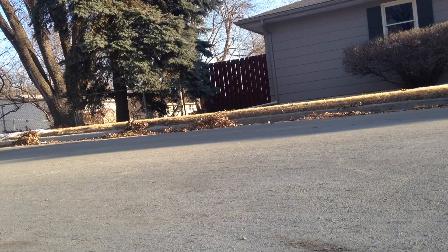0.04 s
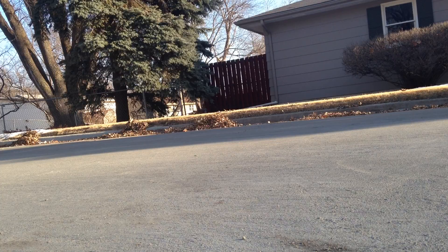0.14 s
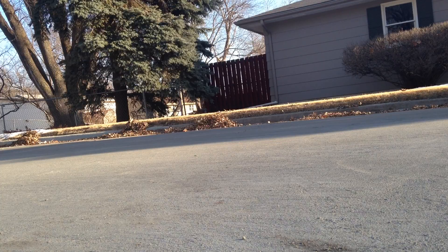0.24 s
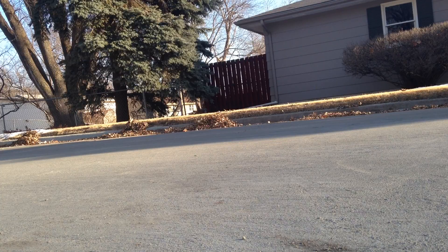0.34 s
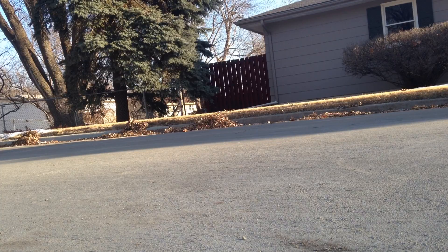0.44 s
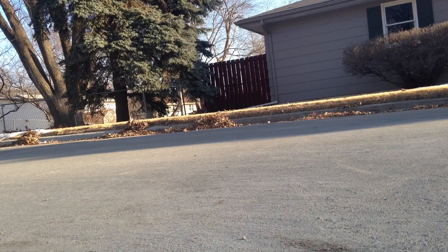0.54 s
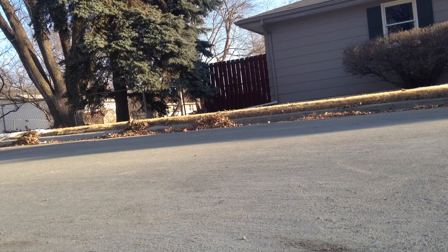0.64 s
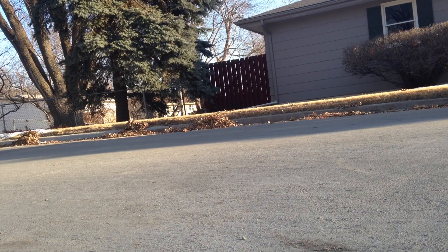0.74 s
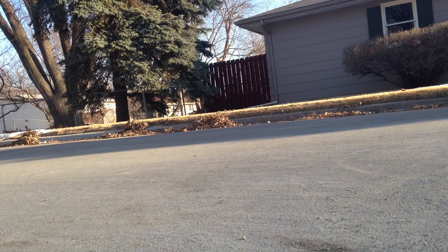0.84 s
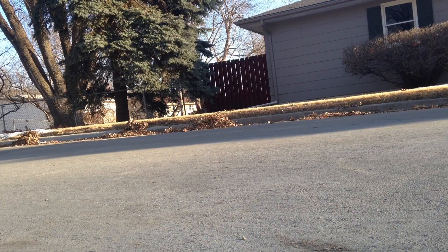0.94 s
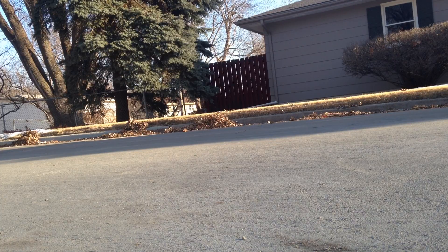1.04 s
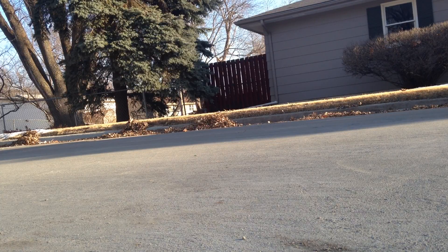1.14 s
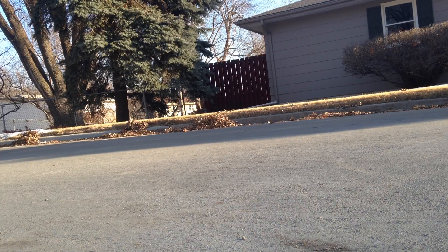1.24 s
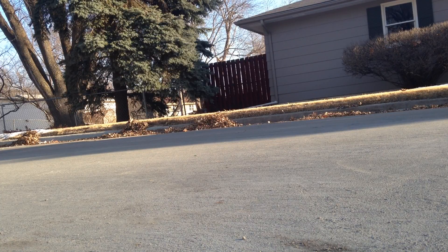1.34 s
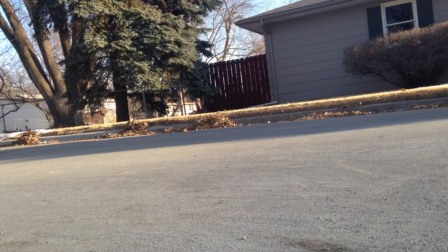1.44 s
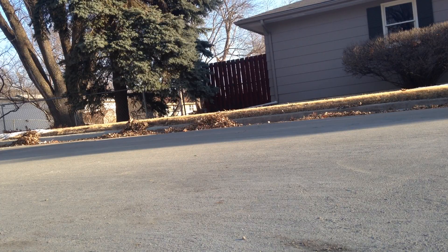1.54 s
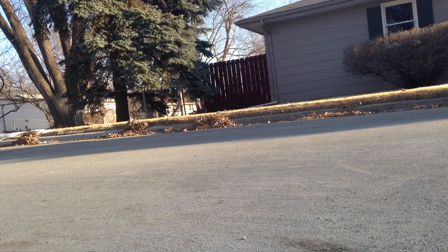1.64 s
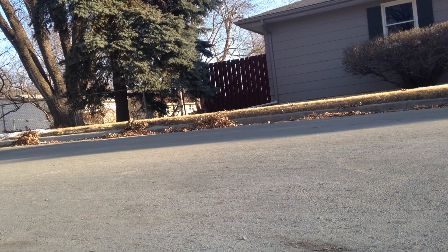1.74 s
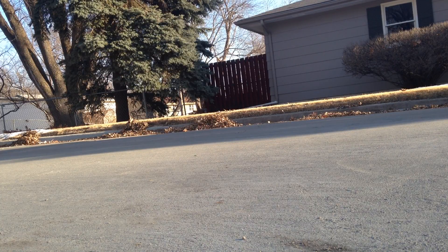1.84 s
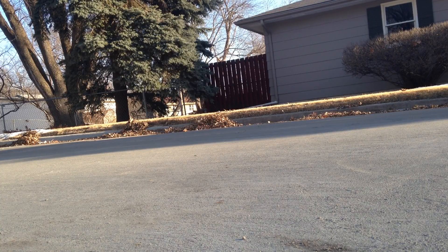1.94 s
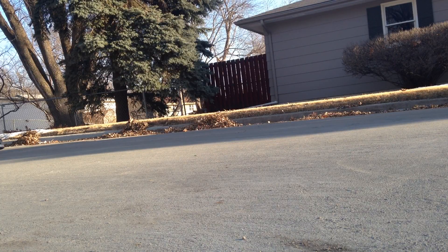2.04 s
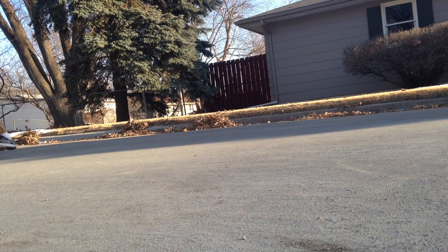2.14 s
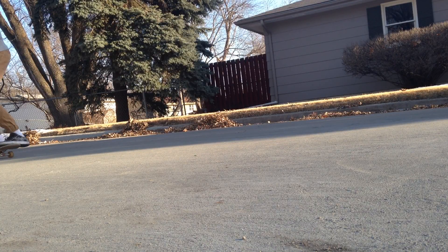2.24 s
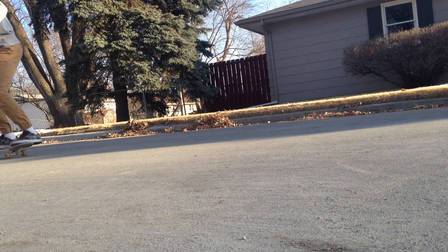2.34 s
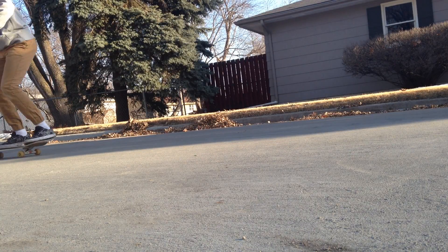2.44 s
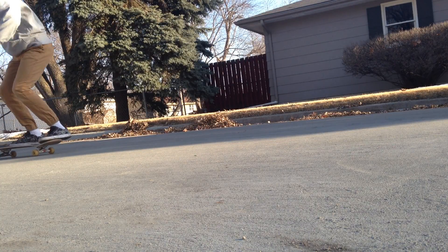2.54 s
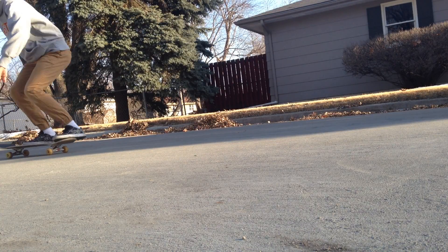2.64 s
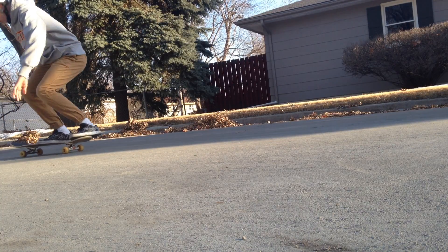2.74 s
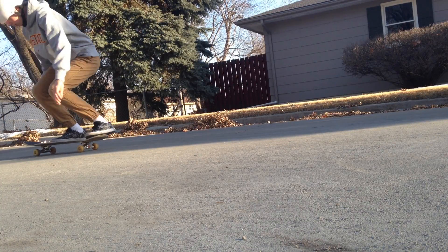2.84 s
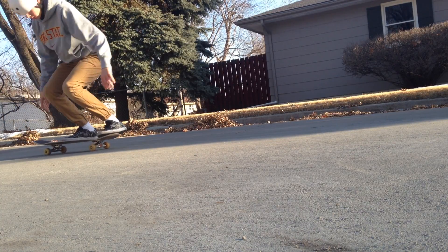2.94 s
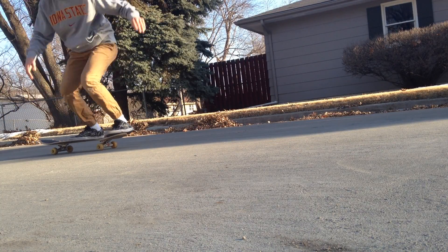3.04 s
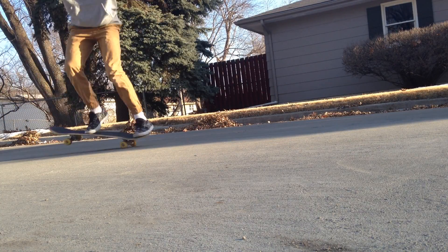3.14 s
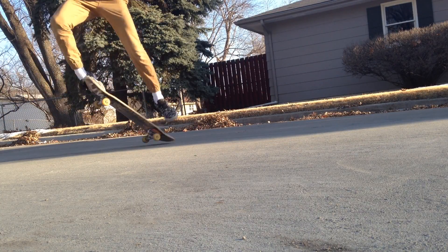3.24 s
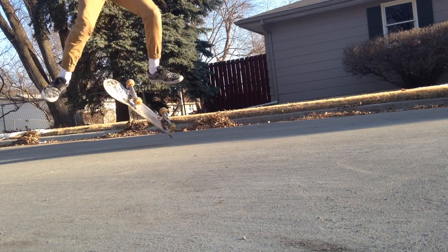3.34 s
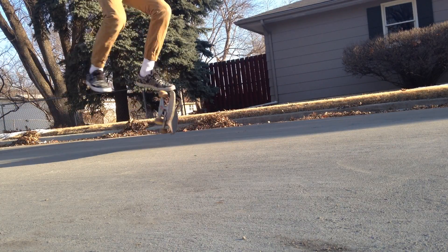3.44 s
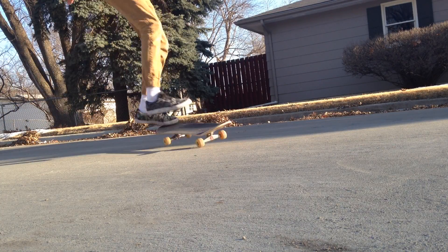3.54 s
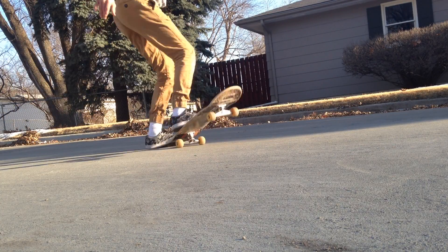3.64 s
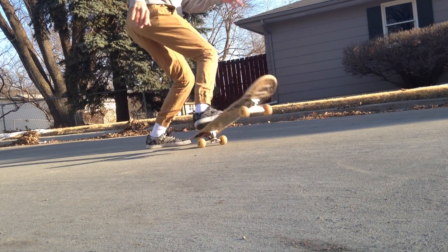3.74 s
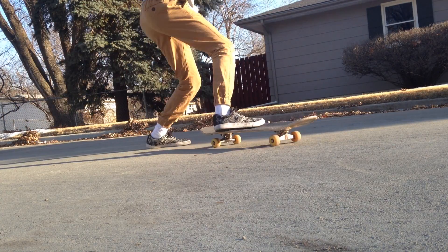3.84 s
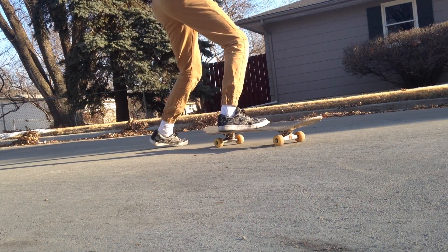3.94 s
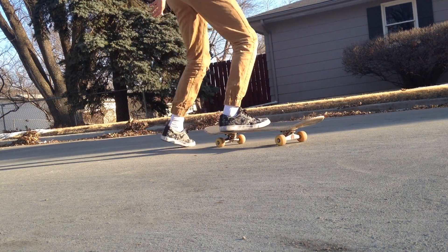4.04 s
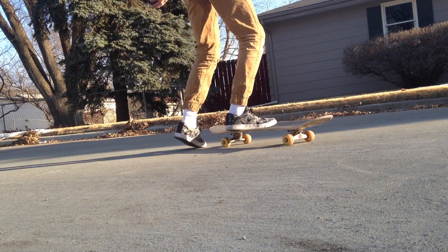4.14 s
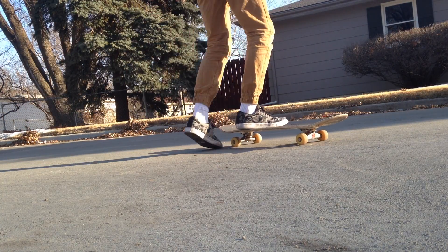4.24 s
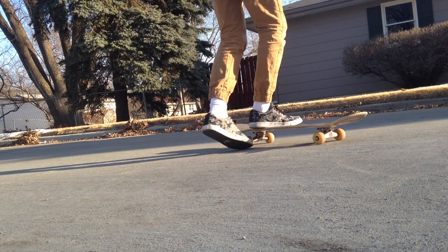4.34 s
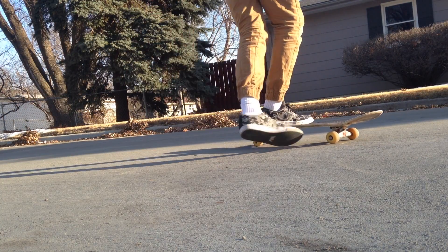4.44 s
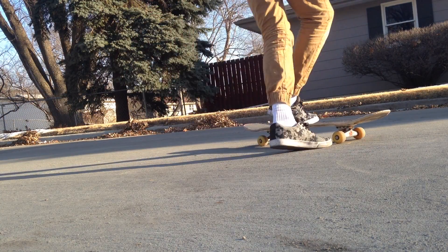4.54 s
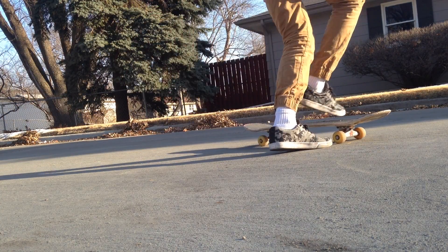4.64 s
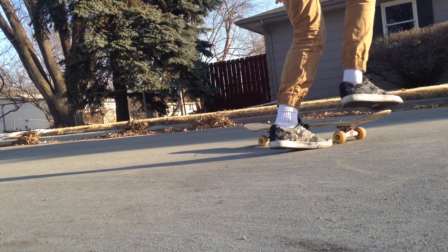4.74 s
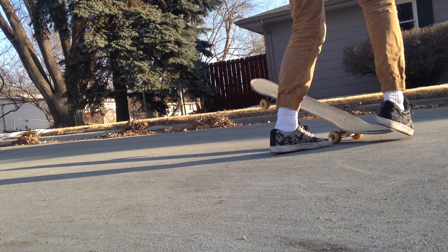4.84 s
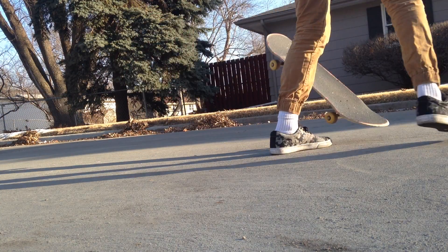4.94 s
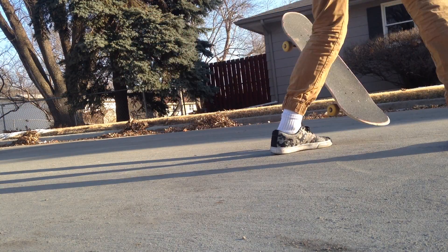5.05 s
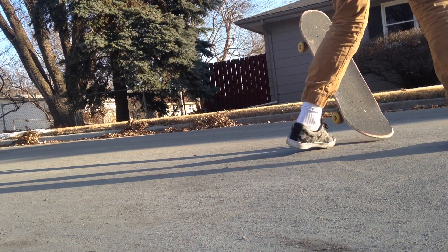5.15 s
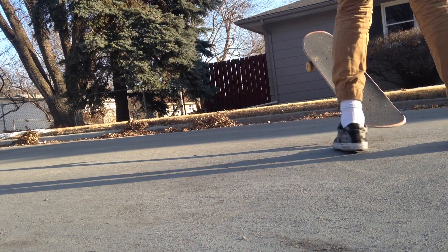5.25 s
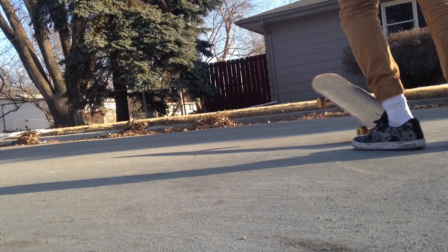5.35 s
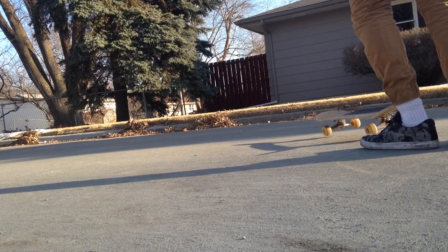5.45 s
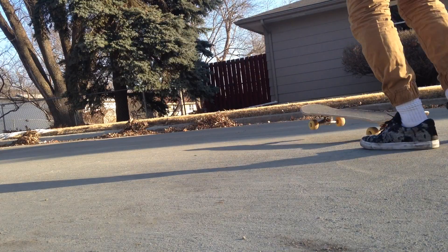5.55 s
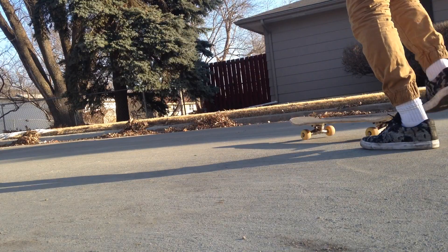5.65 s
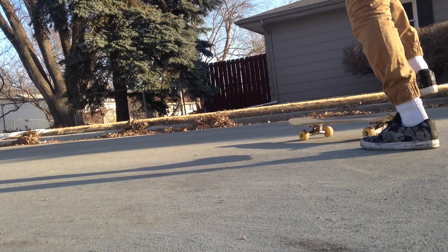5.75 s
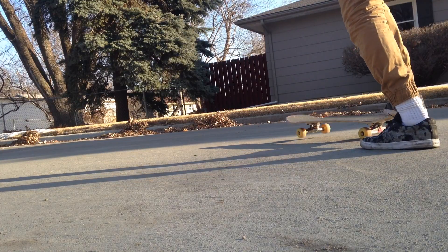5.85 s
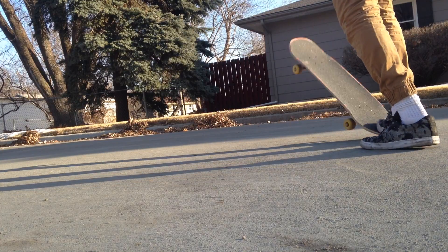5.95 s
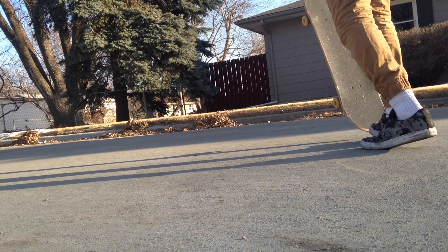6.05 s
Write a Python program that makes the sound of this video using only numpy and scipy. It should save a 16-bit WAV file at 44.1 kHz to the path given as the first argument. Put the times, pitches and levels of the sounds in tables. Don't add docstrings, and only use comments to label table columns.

```python
import sys
import numpy as np
from scipy import signal
from scipy.fft import rfft, irfft, next_fast_len
from scipy.io import wavfile
from scipy.ndimage import uniform_filter1d, map_coordinates

SR = 44100
rng = np.random.default_rng(int(sys.argv[2]) if len(sys.argv) > 2 else 0)


def store_pcm(level_fs):
    pcm = np.round(np.clip(level_fs, -1, 1) * 32767).astype(np.int16)
    wavfile.write(sys.argv[1], SR, np.atleast_2d(pcm).T)


def makeup_ratio(level_db):
    decades = np.asarray(level_db, float) / 20
    return 10 ** decades


N = 268128


def unit(x):
    return x / np.sqrt(np.mean(x ** 2) + 1e-20)


def along(points, hz):
    f, v = np.transpose(points)
    return np.interp(np.log(hz + 1), np.log(f + 1), v)


def curves(rows):
    s, *cols = np.transpose(rows)
    return [np.interp(np.arange(N) / SR, s, c) for c in cols]


def wobble(rate):
    knots = rng.standard_normal(int(N * 200 / SR) + 4)
    return map_coordinates(knots, [np.arange(N) * rate / SR])


def filtered(x, response):
    m = next_fast_len(N + SR // 2)
    return irfft(rfft(x, m) * response(np.fft.rfftfreq(m, 1 / SR)), m)[:N]


def coloured(x, spectrum):
    return unit(filtered(x, lambda hz: makeup_ratio(along(spectrum, hz))))


def resonance(centre_hz, width_hz):
    def response(f):
        swing = 1j * f * width_hz
        return swing / (centre_hz ** 2 - f * f + swing) / np.sqrt(width_hz / SR)
    return response


def bumps(rate, spread_db, smooth):
    hit = rng.random(N) < rate / SR
    size = makeup_ratio(spread_db * np.minimum(rng.exponential(size=N), 4)) * rng.standard_normal(N)
    return unit(hit * size) + smooth * rng.standard_normal(N)


def patchy(x, depth_db):
    z = signal.stft(x, nperseg=512)[2]
    field = uniform_filter1d(rng.standard_normal(z.shape), size=9, axis=0)
    field = uniform_filter1d(field, size=10, axis=1)
    return signal.istft(z * makeup_ratio(depth_db * unit(field)), nperseg=512)[1][:N]


def added(*levels_db):
    return 10 * np.log10(sum(makeup_ratio(2 * db) for db in levels_db))


STROKE_DB = 20


def strokes(rows, base_db, base_value):
    t = np.arange(0, N, 32) / SR
    power = makeup_ratio(2 * base_db[::32])
    value = power * base_value
    for s, rise, fall, db, v in rows:
        away = np.where(t < s, (s - t) / rise, (t - s) / fall).clip(0, 6)
        one = makeup_ratio(2 * (db - STROKE_DB * away))
        power = power + one
        value = value + one * v
    return curves(np.transpose([t, 10 * np.log10(power), value / power]))


def snaps(rows, t60, rise_s, q):
    out, t = np.zeros(N + SR), np.arange(SR // 25) / SR
    for s, db, hz in rows:
        burst = makeup_ratio(-60 * t / t60) * (1 - np.exp(-t / rise_s)) * rng.standard_normal(len(t))
        band = signal.lfilter(*signal.iirpeak(hz, q, SR), burst)
        out[round(s * SR):][:len(t)] += makeup_ratio(db + 8.0) * band / abs(band).max()
    return filtered(out[:N], lambda f: (1j * f / 1200) ** 2 / (1 + 1.4j * f / 1200 - (f / 1200) ** 2))


def plucks(rows):
    out, t = np.zeros(N + SR), np.arange(SR // 16) / SR
    fade = makeup_ratio(-60 * t / 0.026)
    shape = fade * (1 - np.exp(-t / 0.00073)) ** 2
    for (s, db, hz), (a, b, c) in zip(rows, rng.random((len(rows), 3))):
        tone = np.sin(2 * np.pi * (hz * t + a))
        tone += .3 * np.sin(2 * np.pi * (hz * (0.718 + 0.2 * b) * t + c))
        tone += .8 * fade * np.sin(2 * np.pi * (hz * (1.3 + .3 * c) * t + b))
        out[round((s - .001) * SR):][:len(t)] += makeup_ratio(db - 5.0) * tone * shape / shape.max()
    return out[:N]


# (frequency [Hz], level [dB per Hz])
AIR_COLOUR = [(410, -13), (700, -1), (1630, -18), (2880, -24.5), (3780, -23), (15600, -29)]


def air():
    return makeup_ratio(-53.5) * coloured(rng.standard_normal(N), AIR_COLOUR)


# (time [s], level [dB])
ROLLING = [(0, -42.5), (.9, -43), (1.05, -46), (1.12, -44), (1.8, -44.5), (1.97, -37), (2.36, -41.5),
           (2.73, -35.5), (3.08, -47), (3.2, -32.5), (3.66, -46), (3.765, -22.5), (3.86, -45), (4.0, -53.5),
           (4.8, -52), (5.2, -47), (5.57, -47), (6.08, -43.5)]


def rolling_level():
    return curves(ROLLING)[0]


# (time [s], level [dB])
GROUND_RUMBLE = [
    (0, -47),
    (.86, -41),
    (1.3, -45.5),
    (1.9, -44.5),
    (3.4, -45.5),
    (3.75, -57.5),
    (4.6, -52.5),
    (5.0, -50.5),
    (6.08, -47.5),
]
# (frequency [Hz], level [dB per Hz])
RUMBLE_COLOUR = [(13, -57), (22, -25), (50, -10), (97, -0.5), (194, -2.5), (312, -12), (330, -43.5),
                 (430, -31), (730, -120)]
# (frequency [Hz], level [dB per Hz])
TREAD_COLOUR = [(120, -41), (200, -22), (242, 0), (319, -53.5), (410, -5.5), (544, -4.5), (900, -17),
                (1170, -40), (1980, -120)]


def wheels(tread_db):
    rumble = coloured(makeup_ratio(1.2 * wobble(14)) * rng.standard_normal(N), RUMBLE_COLOUR)
    stones = makeup_ratio(2.2 * wobble(22)) * bumps(700, 2.5, smooth=.8)
    bend = unit(filtered(stones, lambda f: resonance(331, 120)(f) ** 2))
    tread = coloured(stones, TREAD_COLOUR) + 0.62 * bend
    rumble_db = curves(GROUND_RUMBLE)[0]
    return makeup_ratio(rumble_db + 4.5) * rumble + makeup_ratio(tread_db - 2.0) * tread


# (time [s], peak level [dB], centre [Hz])
SAND_GRAINS = [(.041, -48, 4500), (.081, -44, 7000), (.1, -46, 7000), (.12, -50, 7500), (.2254, -40, 8150),
               (.2947, -44, 7000), (.3117, -41, 8440), (.392, -52, 7500), (.4643, -54, 4500),
               (.5297, -47, 5000), (.5891, -35, 7500), (.6135, -38, 6800), (.68, -29.5, 6000),
               (.6988, -36, 8500), (.7307, -35, 7500), (.7951, -29, 6000), (.802, -32.5, 7500),
               (.896, -34, 7500), (.904, -32, 8000), (.931, -34, 8000), (.9797, -39, 5000),
               (1.004, -26, 7650), (1.034, -25, 8000), (4.383, -44, 7000), (4.48, -47, 4000),
               (4.512, -39, 4500), (4.543, -41, 5000), (4.556, -44, 6000), (5.393, -18, 4000),
               (5.438, -21.5, 6500), (5.646, -33, 3000), (5.827, -34, 4500), (5.855, -40, 3500),
               (5.918, -31, 5000), (5.972, -36, 3100), (3.348, -24, 3000), (3.392, -28, 2800),
               (3.253, -35, 5000), (3.263, -36, 3500)]


def grains():
    return makeup_ratio(-8.0) * snaps(SAND_GRAINS, t60=0.011, rise_s=.0004, q=2.1)


# (peak time [s], rise [s], fall [s], level [dB], fine over coarse [dB])
GRINDS = [(.045, 0.04, 0.21, -46.5, -12), (.79, 0.22, 0.38, -57, 8), (1.04, 0.71, 0.059, -40, -3),
          (1.42, 9.7, 0.25, -49.5, -4), (1.732, 0.31, 0.14, -45.5, -3.5), (1.92, 0.048, 0.17, -34, -2),
          (2.12, 0.34, 0.95, -44.5, -3.5), (2.711, 0.089, 0.35, -45, -2.5), (2.903, .012, 0.037, -48, -15),
          (3.215, 0.13, 0.039, -31.5, -5.5), (3.315, 0.037, 0.086, -22, -5.5),
          (3.64, 0.094, 0.42, -39.5, -8), (3.72, 0.096, 0.018, -39, 5.5), (3.87, .02, 0.027, -55, -6),
          (3.94, 0.029, 0.016, -33, -3), (4.05, 0.16, 0.025, -42, -0.5), (4.19, 0.05, 0.36, -43.5, 1.5),
          (4.41, 0.72, 0.019, -54, 10.5), (4.56, 0.1, 0.017, -44.5, -14), (4.955, 0.039, 0.077, -29.5, -11),
          (5.37, 0.031, 0.45, -31.5, -10.5), (5.564, 0.051, 0.025, -29, -3.5),
          (5.64, 0.035, 0.074, -30, -8), (5.715, 0.035, 0.045, -26.5, -3)]
# (peak time [s], rise [s], fall [s], level [dB], fine over coarse [dB])
KICKED_SAND = [(.803, 0.015, 0.038, -30.5, -5), (0.944, 0.018, 0.02, -26, -8), (1.006, .006, .012, -41, -2),
               (1.034, 0.01, 0.011, -24.5, -12), (3.727, 0.018, 0.017, -25.5, -4),
               (3.65, 0.018, 0.033, -27, -3.5), (2.487, .008, 0.061, -39.5, -6),
               (2.667, .005, .015, -46, -4), (1.755, 0.022, 0.0091, -36, -6), (4.5, 0.037, 0.097, -49, -18),
               (5.045, 0.0088, 0.062, -33, -9), (5.21, 0.0091, 0.067, -33, -23),
               (5.785, .01, 0.038, -34.5, 1), (5.826, 0.066, 0.013, -36.5, -4),
               (5.9, 0.0075, 0.11, -36.5, -7.5), (6.0, 0.0093, 0.12, -32, -9),
               (6.05, 0.018, 0.14, -36, -15)]
# (frequency [Hz], level [dB per Hz])
COARSE_SAND = [(1290, -13), (2200, 2), (2790, 4), (3540, 9.5), (4310, 3.5), (4660, 6.5), (7000, 0),
               (9100, -21.5), (15400, -120)]
# (frequency [Hz], level [dB per Hz])
FINE_SAND = [(3240, -77), (5500, -21.5), (6460, 3.5), (7360, 6), (8320, 8), (14700, -2), (15600, -21.5)]


def grit(scrape_db):
    coarse_db, fine_over_db = strokes(GRINDS + KICKED_SAND, scrape_db - 25.5, 9)
    sand = patchy(makeup_ratio(2.2 * wobble(70)) * bumps(2500, 2.5, smooth=1.0), depth_db=1.5)
    coarse = makeup_ratio(coarse_db - 6.0) * coloured(sand, COARSE_SAND)
    return coarse + makeup_ratio(coarse_db + fine_over_db - 6.0) * coloured(sand, FINE_SAND)


# (peak time [s], rise [s], fall [s], level [dB], loudest deck resonance [Hz])
TAIL_DRAGS = [(.224, 0.077, 0.26, -39, 1270), (.532, 0.006, 0.65, -32, 1630), (.74, 0.14, 0.3, -27, 1670),
              (.805, 0.37, 0.088, -29, 920), (1.04, 0.52, 0.04, -23, 1180), (1.31, 0.026, 0.18, -34, 1480),
              (1.93, 0.082, 0.089, -30, 1410), (2.15, 0.26, 0.33, -41, 1350),
              (3.315, 0.0072, 0.13, -20, 1090), (3.395, 0.125, 0.031, -20, 1000),
              (3.46, 0.039, 0.078, -28.5, 1300), (3.675, 0.078, 0.18, -27.5, 1290),
              (3.87, 0.035, 0.0062, -22, 1080), (3.94, 0.035, 0.06, -30.5, 1020),
              (4.25, 0.4, 0.14, -41.5, 1110), (4.84, 0.025, 0.011, -34.5, 1370),
              (4.955, 0.027, 0.15, -21, 1260), (5.215, 0.014, 0.15, -15, 1100),
              (5.33, 0.13, 0.36, -27.5, 1250), (5.566, .1, 0.066, -28, 1250),
              (5.64, 0.018, 0.19, -32, 1930), (5.827, 0.24, 0.038, -29, 1820), (5.91, .02, .03, -39, 1380),
              (6.055, 0.015, 0.052, -27.5, 1370)]


def drag_levels(roll_db):
    above_stall_db = roll_db + 45.5
    shake_db = -47.5 + np.minimum(0.095 * above_stall_db, 1.6 * above_stall_db) + 0.5
    return strokes(TAIL_DRAGS, shake_db, 1000)


# (frequency [Hz], width [Hz], level [dB])
SCRAPED_DECK = [(590, 164, -29), (826, 280, 12), (885, 152, 10.5), (1173, 260, 1), (1460, 124, 3.5),
                (1770, 660, 12.5), (1930, 1300, 7), (2640, 660, -8)]


def scrape(level_db, focus_hz):
    pluck = makeup_ratio(level_db) * unit(makeup_ratio(2.2 * wobble(110)) * bumps(2000, 2.2, smooth=1.1))
    deck = np.zeros(N)
    for k, (hz, width_hz, db) in enumerate(SCRAPED_DECK):
        near = .65 + np.exp(-(np.log(focus_hz / hz) / .17) ** 2)
        flutter = makeup_ratio(db - 20.0 + 1.6 * wobble(25))
        deck += (-1) ** k * flutter * filtered(near * pluck, resonance(hz, width_hz))

    def wood(f):
        low_cut = (1j * f / 450) / (1 + 1j * f / 450)
        return low_cut / (1 + 1.2j * f / 2300 - (f / 2300) ** 2) / (1 + 1j * f / 2300)

    def trucks(f):
        return makeup_ratio(-62) * resonance(3650, 500)(f) ** 2 + makeup_ratio(-43.5) * resonance(2700, 1500)(f)

    return filtered(deck, wood) + filtered(pluck, trucks)


# (time [s], peak level [dB], deck tone [Hz])
LIGHT_KNOCKS = [(.2274, -36, 1920), (.2633, -37, 1810), (.279, -37, 1590), (.2947, -38, 2130),
                (.4953, -32, 1890), (.5357, -26, 1630), (.5546, -24, 1700), (.565, -25, 2030),
                (3.302, -9.5, 2104), (3.452, -20, 1720), (3.731, -9, 1023), (3.856, -3, 1436),
                (4.04, -35, 910), (4.395, -32, 900), (5.392, -0.5, 1600), (5.397, -5.5, 1790),
                (5.408, -15, 1510), (5.416, -19, 1910), (5.431, -12, 1710), (5.479, -4, 1820),
                (4.941, -2, 1110), (5.778, -17, 1900), (5.618, -11, 1270), (5.853, -30, 1900),
                (3.31, -6.5, 700)]


def knocks():
    return plucks(LIGHT_KNOCKS)


# (frequency [Hz], level [dB], share of ring time [1])
CLACK_TONES = [(593, -14, 1), (756, 2.5, 0.44), (910, 5, 0.36), (1056.4, -3, 0.8), (1290, 5, 0.34),
               (1480, -2.5, 0.55), (1707, 7, 0.3), (1974, -6, 0.57), (2346, -13.5, 0.54), (2570, -10, 0.46)]
# (frequency [Hz], level [dB], share of ring time [1])
THUD_TONES = [(155, -6, 0.89), (199.4, -4.5, 1.6), (321, 5, 0.5), (405, 1.5, 0.92), (477.5, -1, 1.18),
              (531, 8, 0.75)]


def ring(tones, t, t60, rise, rattle, focus_hz):
    hz, db, share = np.transpose(tones)[..., None]
    luck = rng.standard_normal((3, len(tones), 1))
    db = db + 2.6 * luck[0] + 9 * np.exp(-(np.log(hz / focus_hz) / 0.22) ** 2)
    swing = np.sin(2 * np.pi * hz * (1 + 0.039 * luck[1]) * t + 0.92 * luck[2])
    tone = makeup_ratio(db - 60 * t / (share * t60)) * swing
    shake = np.interp(t, t[::40], rng.standard_normal(len(t[::40])))
    x = tone.sum(0) * (1 + rattle * shake) * rise
    return x / abs(x).max()


# (time [s], clack peak [dB], loudest tone [Hz])
TAIL_JOLTS = [
    (0.47, -35, 1940),
    (0.494, -39, 1940),
    (3.347, -7.5, 1070),
    (3.369, -13, 1050),
    (3.445, -17, 1340),
    (3.455, -14, 1480),
    (3.483, -21, 1480),
]
# (time [s], clack peak [dB], loudest tone [Hz], thud [dB], crack [dB])
HARD_SLAMS = [(1.938, -5, 790, -1.5, -10), (3.301, -6.5, 640, -3, -5), (3.603, -1, 1200, 0.5, -1.5),
              (3.61, -0.5, 660, -10, -25.5), (3.635, 0.5, 1180, -2.5, -9.5), (3.726, -9.5, 1700, -20, -8),
              (3.853, 3.5, 1000, -11, -6.5), (4.937, -2, 1080, -3, -7.5), (5.199, -2, 1155, -0.5, -16.5),
              (5.389, -1.5, 1470, 2, -23), (5.428, -7, 1210, -5.5, -9), (5.4772, -1.5, 1170, 1, -5.5),
              (5.701, -2, 1920, -7, -5), (5.984, 0.5, 1600, -7, -4), (6.039, -5.5, 1200, -7.5, -35)]
# (time [s], clack peak [dB], loudest tone [Hz], thud [dB], crack [dB])
LIGHT_TAPS = [(1.462, -23, 753, -5.5, -9.5), (2.299, -25, 760, -11, 2), (3.667, -13.5, 756, -2.5, 1.5),
              (3.92, -10.5, 1100, -8.5, -6.5), (4.054, -27.5, 950, -32, -18), (4.558, -28.5, 810, 2, -19),
              (4.578, -36, 1000, -12, -15), (4.819, -14, 790, 2, 1.5), (5.037, -15.5, 760, -12, 5),
              (5.089, -24, 820, 2, -36), (5.495, -12, 1400, -1, 2.5), (5.555, -15.5, 1290, -3.5, -5.5),
              (5.615, -11, 1290, -3.5, 1), (5.779, -11.5, 1770, -32, -7), (5.892, -17, 1230, -1.5, 0.5),
              (6.035, -10.5, 1130, -4.5, 1)]
# (frequency [Hz], level [dB per Hz])
CRACK_COLOUR = [(1350, -1), (2300, 7), (2610, -2.5), (3380, 6.5), (4510, 0.5), (7830, -4.5), (9950, -10),
                (11900, -24), (14600, -27), (15600, -34)]


def blows():
    slam_t60, tap_t60, jolt_t60 = 0.057, 0.041, 0.039
    hits = [(*row, slam_t60) for row in HARD_SLAMS]
    hits += [(*row, tap_t60) for row in LIGHT_TAPS]
    hits += [(*row, -38, -36, jolt_t60) for row in TAIL_JOLTS]
    hits += [(s - 0.00605, min(db, 0) - 25, hz, -3, -12, tap_t60) for s, db, hz, *_ in HARD_SLAMS]
    deck, crack, t = np.zeros(N + SR), np.zeros(N + SR), np.arange(SR // 7) / SR
    for s, db, hz, thud_db, crack_db, t60 in hits:
        start = round((s - .0008) * SR)
        at = slice(start, start + len(t))
        rise = 1 - np.exp(-t / (0.0019 * makeup_ratio(-.6 * db)))
        deck[at] += makeup_ratio(db + 1.5) * ring(CLACK_TONES, t, t60, rise, rattle=.6, focus_hz=hz)
        deck[at] += makeup_ratio(db + thud_db + 1.5) * ring(THUD_TONES, t, t60, rise, rattle=.1, focus_hz=325)
        fade = makeup_ratio(-60 * t / (.5 * t60)) + 0.055 * makeup_ratio(-60 * t / (1.7 * t60))
        crack[at] += makeup_ratio(db + crack_db + 1.0) * fade * np.sqrt(rise)
    radiated = filtered(deck[:N], lambda f: (1j * f / 130) ** 2 / (1 + 1j * f / 130) ** 2)
    return radiated + crack[:N] * coloured(bumps(4000, 3.5, smooth=0.72), CRACK_COLOUR)


# (time [s], peak level [dB], deck tone [Hz])
STONE_CATCHES = [(.589, -16, 1770), (.614, -22, 1110), (.646, -18, 1770), (.661, -24, 1870),
                 (.6825, -7.5, 1740), (.699, -8.5, 1794), (.705, -15, 1740), (.703, -15.5, 940),
                 (.731, -13.5, 1210), (.745, -18, 865), (.76, -15, 1770), (.78, -13, 927),
                 (.781, -17, 1780), (.79, -13, 1800), (.796, -15, 920), (.811, -9.5, 900),
                 (.829, -23, 1810), (.855, -25, 1800), (.899, -23, 1900), (.906, -20, 1820),
                 (.941, -18, 890), (.954, -12, 1213), (.981, -15, 1170), (.988, -12.5, 1200),
                 (1.008, -12, 1230), (1.024, -22, 1170), (1.035, -11.5, 1300), (5.226, -10, 1100),
                 (5.236, -8, 1170), (5.242, -14, 1490)]


def stone_catches():
    return plucks(STONE_CATCHES)


# (peak time [s], rise [s], fall [s], level [dB], resonance [Hz])
DECK_DRONES = [(1.028, 0.081, 0.07, -30, 377), (3.32, 0.022, 0.071, -21.5, 692),
               (3.77, 0.041, .07, -27, 330), (4.37, 0.041, 0.092, -48.5, 418),
               (5.25, 0.06, 0.18, -32.5, 525), (5.22, 0.032, 0.063, -34.5, 185),
               (3.365, 0.03, 0.049, -24.5, 995), (3.39, 0.023, .025, -35, 2800),
               (3.465, 0.03, 0.044, -30, 1480), (3.9, 0.054, 0.065, -33, 130),
               (3.728, 0.0098, 0.009, -18, 3200), (3.859, 0.0092, 0.017, -14.5, 1156),
               (1.945, .01, 0.036, -21.5, 740), (4.98, 0.029, 0.046, -34.5, 3600),
               (4.5, 0.036, .08, -33, 490), (5.2, 0.0039, 0.011, -23.5, 3860),
               (5.29, 0.11, 0.12, -35, 1820), (5.33, 0.074, 0.11, -41, 1180),
               (6.039, 0.004, 0.0093, -15, 3940), (1.326, 0.084, 0.11, -44.5, 2500),
               (5.484, 0.014, 0.025, -10.5, 310), (4.14, 0.063, 0.27, -51.5, 3200),
               (3.64, 0.0055, 0.018, -15.5, 1050), (0.76, 0.094, 0.13, -28.5, 894),
               (0.744, 0.16, 0.15, -30, 1780)]


def drones():
    out = np.zeros(N)
    for s, rise, fall, db, hz in DECK_DRONES:
        start = max(round((s - 2 * rise) * SR) - 2000, 0)
        at = slice(start, min(round((s + 2 * fall) * SR) + 2000, N))
        t = np.arange(N)[at] / SR
        band = signal.iirpeak(hz, 11 / (1 + hz / 900), SR)
        bend = signal.lfilter(*band, signal.lfilter(*band, rng.standard_normal(len(t))))
        bend = unit(bend / np.sqrt(abs(uniform_filter1d(bend ** 2, size=1500)) + 1e-12))
        away = np.where(t < s, (s - t) / rise, (t - s) / fall)
        out[at] += makeup_ratio(db - STROKE_DB * away ** 2) * bend
    return out


# (time [s], peak level [dB], centre [Hz])
TRUCK_CLICKS = [(0.78, -30, 2730), (0.855, -36, 3900), (2.0926, -37, 2640), (2.713, -40, 2820),
                (2.8435, -48, 2760), (2.964, -29.5, 4320), (2.9988, -31, 4120), (3.036, -49, 5000),
                (3.048, -40, 4660), (3.065, -35, 3670), (3.1435, -35.5, 4500), (3.245, -40, 7760),
                (3.607, -7.5, 3620), (3.6665, -37, 3400), (3.7258, -17, 2970), (3.7654, -37.5, 2400),
                (3.9584, -43, 3570), (3.9639, -43, 3500), (3.9855, -42, 6980), (3.995, -45.5, 7900),
                (4.0223, -39.5, 7750), (4.3945, -31.5, 5620), (4.4058, -37.5, 8260), (4.845, -40.5, 5550),
                (4.895, -37, 4460), (5.083, -38, 7500), (6.0367, -12, 3860)]


def truck_clicks():
    return snaps(TRUCK_CLICKS, t60=0.015, rise_s=.0007, q=2.2)


# (time [s], peak level [dB], centre [Hz])
EDGE_CRACKS = [(2.9015, -48, 9480), (2.9065, -31, 10500), (2.957, -44, 6000), (3.024, -46, 9000),
               (3.3005, -17, 5900), (3.347, -23, 3000), (3.5904, -37.5, 4980), (3.6025, 0, 8800),
               (3.607, -14, 7500), (3.6195, -2.5, 3480), (3.6345, -10.5, 4480), (3.635, -12, 8500),
               (3.662, -24, 4500), (3.6896, -26, 6180), (3.8535, -7.5, 8500), (4.407, -28, 8040),
               (4.4105, -31.5, 8000), (4.579, -46, 1900), (5.4765, -3.5, 6800)]


def edge_cracks():
    return makeup_ratio(-6.5) * snaps(EDGE_CRACKS, t60=0.0065, rise_s=.0003, q=2.8)


# (time [s], peak level [dB], centre [Hz])
TRUCK_PINGS = [
    (2.9646, -33, 5360),
    (2.999, -39, 5260),
    (3.0364, -44, 5150),
    (3.048, -36, 5130),
    (3.0658, -42, 5200),
    (3.0978, -53, 5200),
    (3.1172, -51, 5170),
    (3.7126, -42, 3580),
]


def truck_pings():
    return snaps(TRUCK_PINGS, t60=0.0077, rise_s=0.00047, q=8.1)


# (time [s], level [dB], squeak band [Hz])
SOLE_SLIDE = [
    (4.05, -110, 3100),
    (4.09, -54, 3105),
    (4.12, -52, 3300),
    (4.2, -48, 3910),
    (4.27, -45, 5200),
    (4.32, -57.5, 5720),
    (4.35, -67, 5900),
    (4.4, -110, 6200),
]


def sole():
    level_db, centre_hz = curves(SOLE_SLIDE)
    slow = filtered(rng.standard_normal(N), lambda f: 1 / (1 + (f / 1000) ** 2))
    squeak = np.sqrt(2) * np.sin(2 * np.pi * np.cumsum(centre_hz) / SR)
    return makeup_ratio(level_db) * unit(slow) * squeak


# (frequency [Hz], time to fall 60 dB [s])
WALL_ECHO = [(200, 0.13), (1000, 0.15), (4000, 0.0216), (12000, 0.022)]


def walls(x):
    out, step = np.zeros(N + SR), SR // 4
    for start in range(0, N, step):
        hz, t, z = signal.stft(rng.standard_normal(SR // 3), SR, nperseg=256)
        fade = makeup_ratio(-60 * t / along(WALL_ECHO, hz)[:, None])
        tail = signal.istft(z * fade, SR, nperseg=256)[1]
        wet = signal.fftconvolve(x[start:start + step], tail / np.linalg.norm(tail))
        out[start + 300:][:len(wet)] += wet
    return out[:N]


def scene():
    roll_db = rolling_level()
    scrape_db, focus_hz = drag_levels(roll_db)
    ground = wheels(added(roll_db, scrape_db - 11.0)) + grit(scrape_db)
    ground = ground + scrape(scrape_db + 5.5, focus_hz) + drones() + sole()
    sharp = grains() + knocks() + blows() + stone_catches()
    sharp = sharp + truck_clicks() + edge_cracks() + truck_pings()
    return (air() + ground + sharp + makeup_ratio(-20.5) * walls(sharp))[None]


def band_limit(x):
    return signal.sosfilt(signal.butter(12, 15730, fs=SR, output="sos"), x)


def record(dry):
    clipped = dry / (1 + abs(dry) ** 40) ** (1 / 40)
    return band_limit(clipped)


dry = scene()
out = record(dry)
store_pcm(out)
```